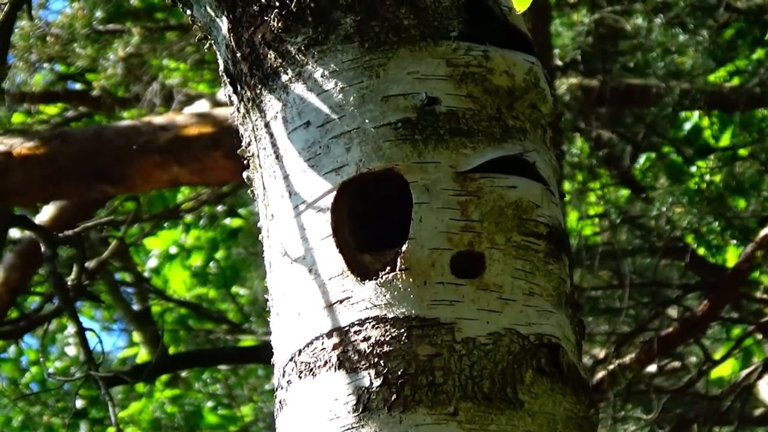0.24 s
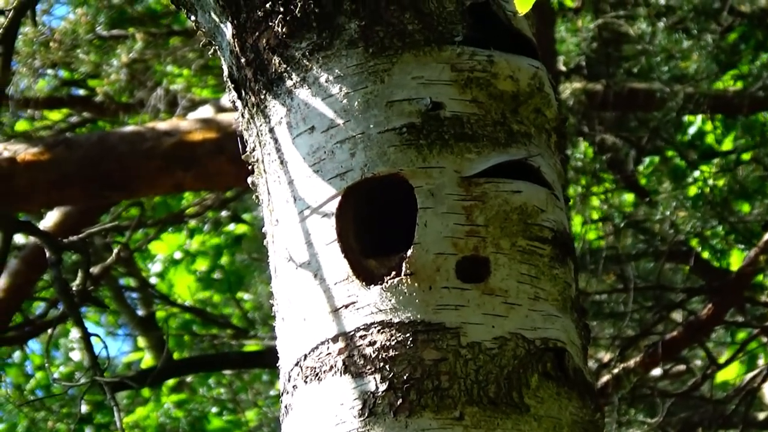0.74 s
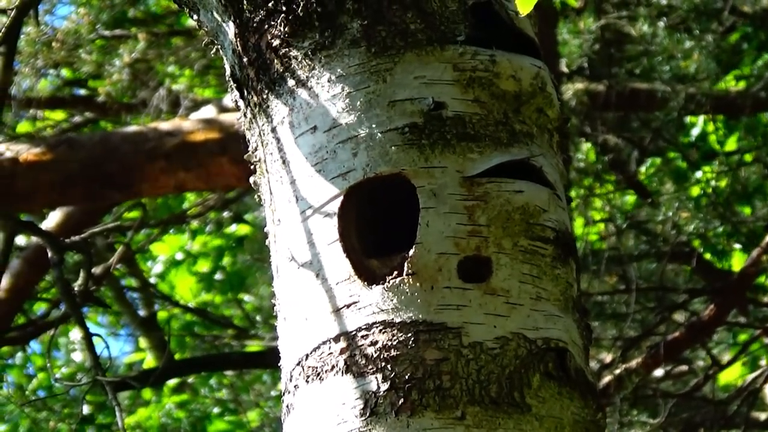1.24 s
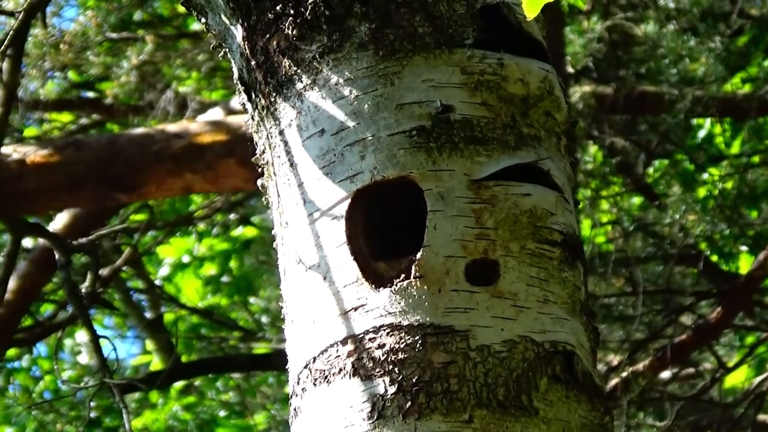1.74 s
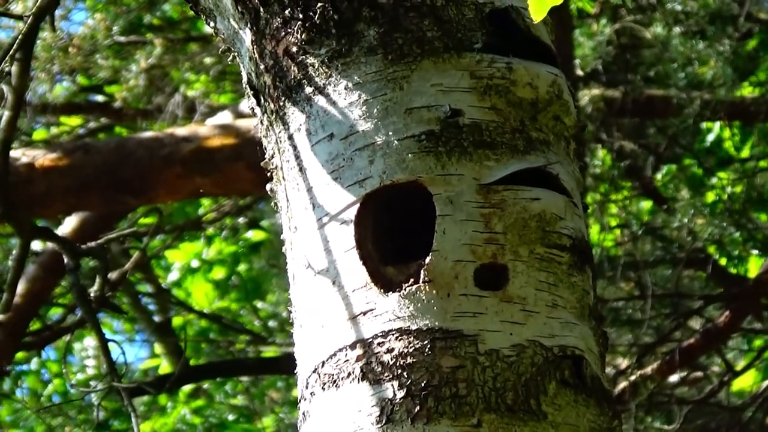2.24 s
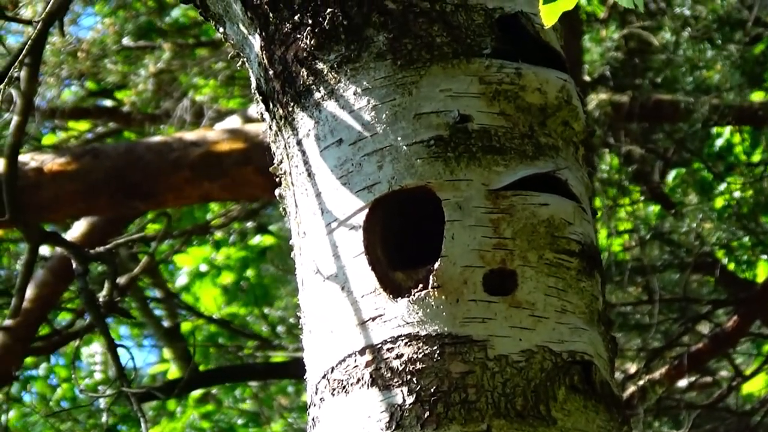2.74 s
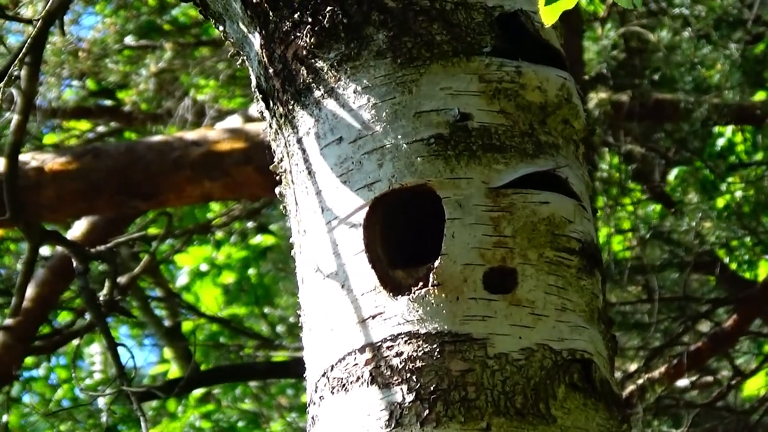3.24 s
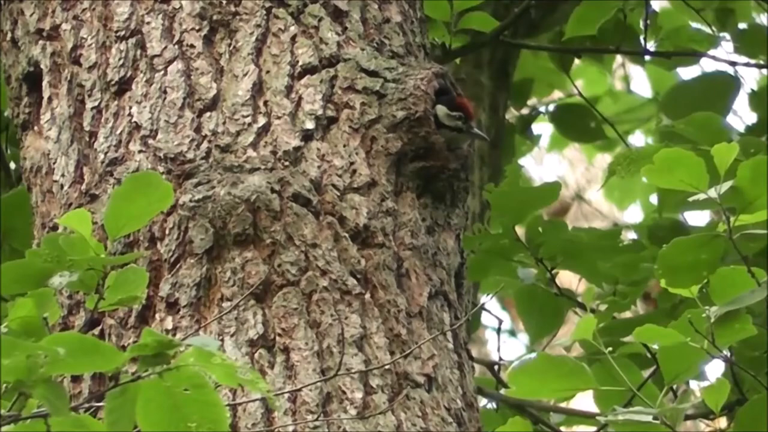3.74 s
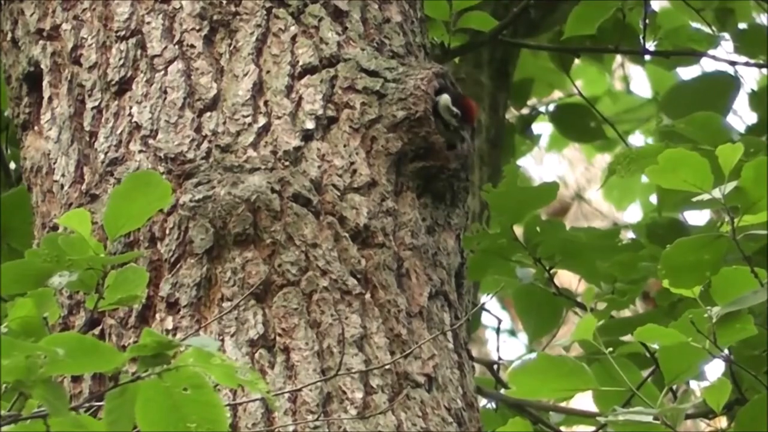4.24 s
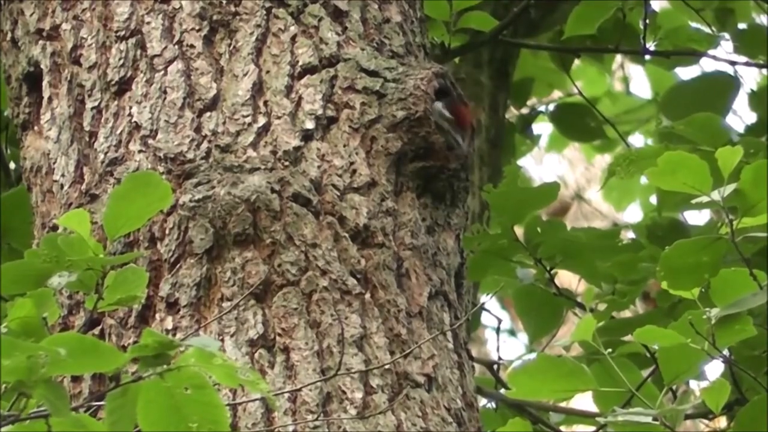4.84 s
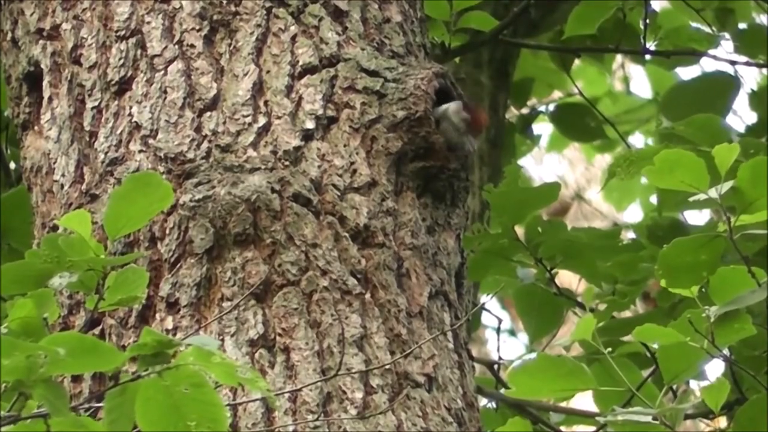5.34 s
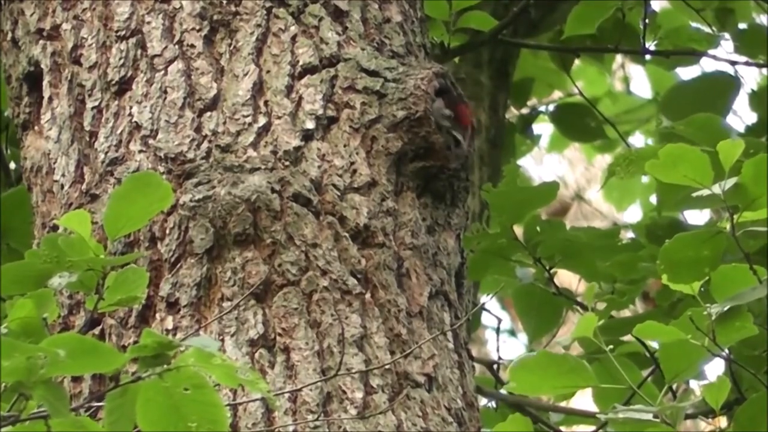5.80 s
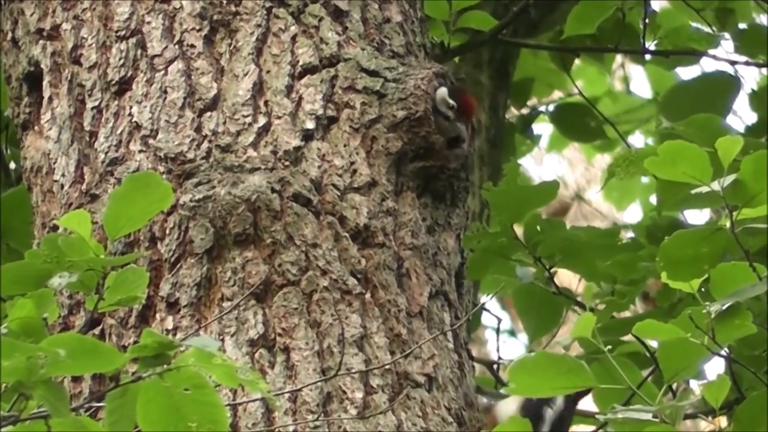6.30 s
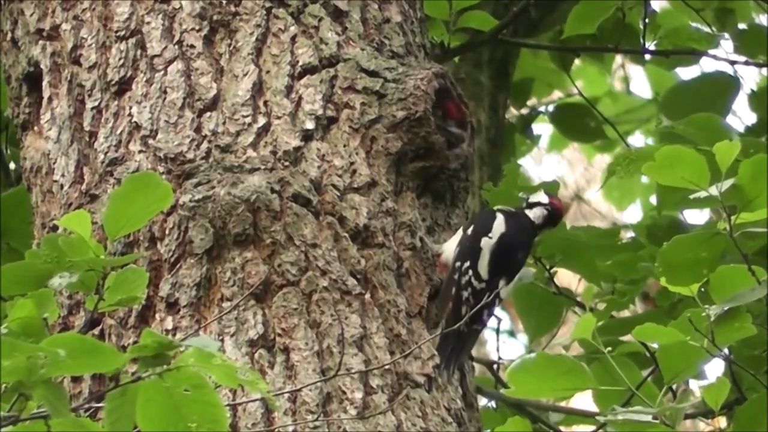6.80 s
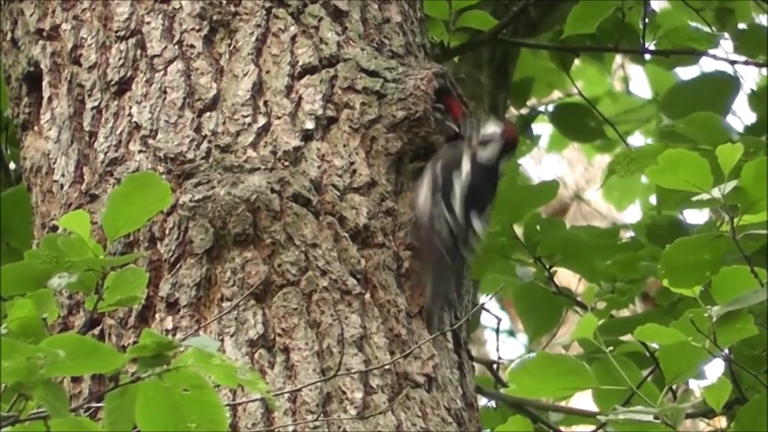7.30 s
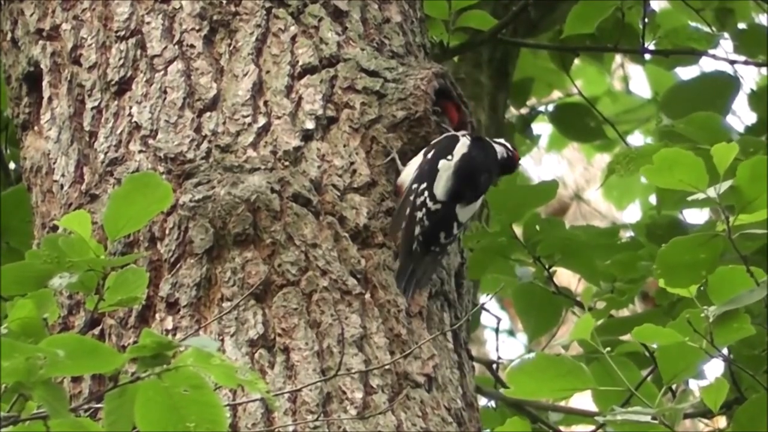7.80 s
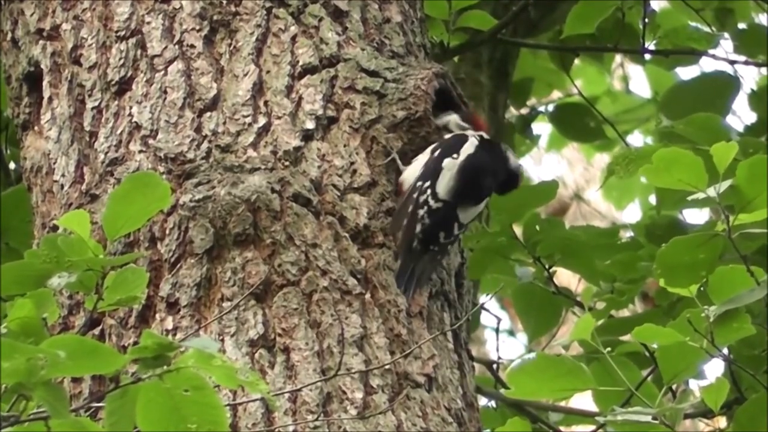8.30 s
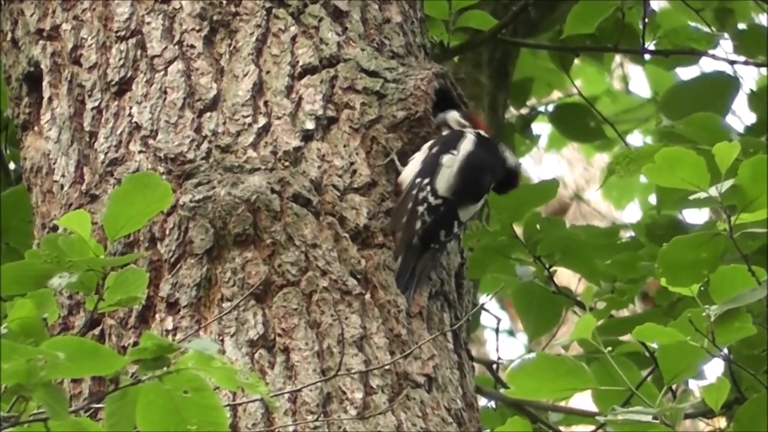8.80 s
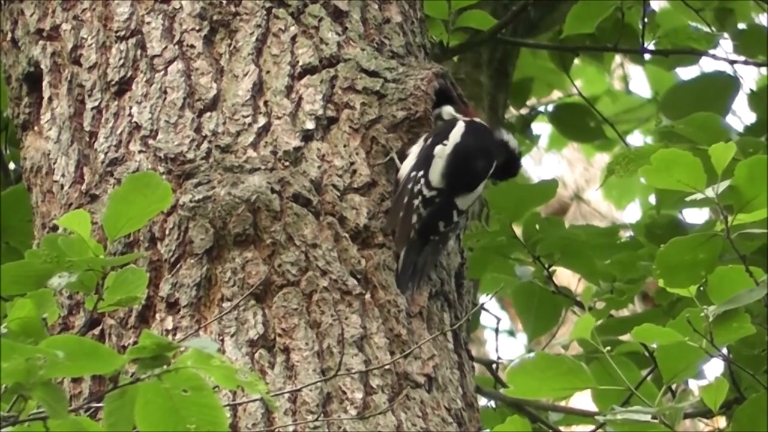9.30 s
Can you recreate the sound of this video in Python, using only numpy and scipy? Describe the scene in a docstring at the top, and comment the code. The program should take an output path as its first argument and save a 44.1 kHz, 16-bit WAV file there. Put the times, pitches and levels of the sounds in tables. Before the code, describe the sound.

Insistent begging squeaks from a close woodpecker nest cut to farther, echoing single chirps in a still forest, with a songbird whistling far off.

```python
"""A wood with two woodpecker nest holes, heard one after the other. Notes are gliding harmonic stacks plus hiss.
First, close by: a chick squeaks in quick pairs over a breeze of filtered noise and a faint sliding moan.
Second, further off, in quiet air and far traffic: a chick repeats one arched note that rings among the trees
(dense noise echoes), and falters as a parent feeds it, with a short rustle on the bark.
A distant songbird whistles in both: slurred sines with a long echo."""
import sys
import numpy as np
from scipy import signal
from scipy.fft import rfft, irfft, next_fast_len
from scipy.io import wavfile

SR = 44100
rng = np.random.default_rng(int(sys.argv[2]) if len(sys.argv) > 2 else 0)


def master_out(mix):
    """Clip the mix to full scale and print it as 16-bit PCM to the path in sys.argv[1]."""
    frames = np.transpose(np.atleast_2d(mix))
    ceiling = np.clip(frames, -1, 1)
    pcm = np.round(ceiling * 32767).astype(np.int16)
    wavfile.write(sys.argv[1], SR, pcm)


N = 421155
TIME = np.arange(N) / SR   # s


def from_db(db):
    """Decibels to amplitude gain."""
    return 10 ** (np.asarray(db) / 20)


def rms_one(x):
    """Scale to unit power."""
    return x / np.sqrt(np.mean(x ** 2) + 1e-20)


def in_time(rows):
    """Control curve at every sample, linear between (t/s, value) rows."""
    return np.interp(TIME, *np.transpose(rows))


def at_hz(points, hz):
    """Read (f/Hz, value) points on a log-frequency axis."""
    f_hz, value = np.transpose(points)
    return np.interp(np.log(np.maximum(hz, 1)), np.log(f_hz), value)


def wander(size, rate_hz, count=512):
    """Random motion about 0: straight lines between unit-normal points."""
    return np.interp(np.arange(size) * rate_hz / SR, np.arange(count), rng.standard_normal(count))


def noise(spectrum, channels=2):
    """Unrelated noises with one spectrum, rms 1."""
    size = next_fast_len(N)
    hz = np.fft.rfftfreq(size, 1 / SR)
    bins = rfft(rng.standard_normal((channels, size))) * from_db(at_hz(spectrum, hz))
    return rms_one(irfft(bins, size)[:, :N])


def stereo(pair, likeness):
    """Mix two unrelated noises into left and right of the given correlation."""
    c = np.clip(likeness, 0, 1)
    middle = np.sqrt(1 + c) * pair[0]
    side = np.sqrt(1 - c) * pair[1]
    return (middle + side * [[1], [-1]]) / np.sqrt(2)


def lean(x, left_db):
    """Set left against right by left_db; the two gains sum to 2."""
    left = from_db(left_db)
    return x * 2 * np.array([[left], [1]]) / (1 + left)


def add(track, start_s, sound):
    """Lay a sound into a track at a time."""
    i = max(round(start_s * SR), 0)
    track[i:i + len(sound)] += sound[:N - i]


# Colour of the wood's echo: f/Hz, level/dB
FOREST = [(1000, -4.5), (2400, 4), (4700, 9), (7200, 2.5), (9000, -5), (14000, -1.5)]


def scatter(x, t60_s, build_s, likeness, spectrum=FOREST):
    """Dense echoes off bark and leaves: they build up, then die away."""
    t = TIME[:SR + SR // 2]
    envelope = from_db(-60 * t / t60_s) * (1 - np.exp(-t / build_s))
    tail = rng.standard_normal((2, len(t))) * envelope
    tail = stereo(tail / np.sqrt(np.sum(tail ** 2, axis=1, keepdims=True)), likeness)
    colour = from_db(at_hz(spectrum, np.fft.rfftfreq(len(t), 1 / SR)))
    tail = irfft(rfft(tail) * colour)[:, :SR + SR // 4]
    return signal.fftconvolve(x[None], tail, axes=1)[:, :N]


# Quiet air, relative density: f/Hz, level/dB per Hz
STILL_AIR = [(18, -49), (30, -12), (192, -11.5), (420, -13.5), (1330, -15), (2300, -7), (2620, -6.5),
             (4540, -5.5), (5170, -9), (6540, -8.5), (7260, -18), (11900, -28), (15500, -44)]
# Left-right difference of the quiet air: f/Hz, side-to-middle level/dB
AIR_WIDTH = [(60, -16), (200, -4), (380, 0), (700, -0.5), (1300, -2.5), (2400, -23.5), (8000, -72)]
# Far traffic, before drone_trim_db: t/s, level/dB
DRONE = [(3.62, -56), (6.03, -65.5), (7.7, -57), (9.5, -72)]


def calm_wood(air_db=-53, drone_trim_db=-2):
    """Quiet air, wide in the low middle and centred in the treble, and a low swell of far traffic."""
    middle, side = noise(STILL_AIR)
    size = next_fast_len(N)
    width = from_db(at_hz(AIR_WIDTH, np.fft.rfftfreq(size, 1 / SR)))
    side = irfft(rfft(side, size) * width, size)[:N]
    air = from_db(air_db) * (middle + side * [[1], [-1]])
    drone_spectrum = [(40, -40), (80, -10.5), (140, -13.5), (215, -4.0), (270, -8.5), (400, -19.0), (1200, -77)]
    drone = stereo(noise(drone_spectrum), likeness=1.0)
    return air + from_db(in_time(DRONE) + drone_trim_db) * drone


# Air moving in the crowns, relative density: f/Hz, level/dB per Hz
BREEZE = [(30, -11.5), (70, -5), (150, -1), (350, 0), (700, -1.5), (1000, -5.5), (1500, -10.5), (3000, -15),
          (7000, -21), (11000, -21.5), (15500, -26.5)]
# Its level, before air_trim_db: t/s, level/dB
BREEZE_LEVEL = [(0.0, -39.5), (0.67, -40), (0.8, -40), (3.5, -40.5)]
# Wind on the microphone: t/s, level/dB
GUSTS = [(0.0, -54.5), (0.29, -44), (0.41, -67), (2.01, -64.5), (2.27, -44.5), (3.32, -68), (3.5, -51)]


def breeze(air_trim_db=1.5, air_left_db=-11.5, gust_left_db=-15):
    """Moving air in the crowns and soft buffets on the microphone, mostly from the right."""
    air = from_db(in_time(BREEZE_LEVEL) + air_trim_db) * stereo(noise(BREEZE), likeness=0.51)
    buffet_spectrum = [(10, -8.5), (30, -9.5), (70, 1.0), (160, -22), (600, -86)]
    buffets = from_db(in_time(GUSTS)) * stereo(noise(buffet_spectrum), likeness=0.43)
    return lean(air, air_left_db) + lean(buffets, gust_left_db)


def moan(start_s=0.54, length_s=0.48, start_hz=520, end_hz=300, level_db=-45, wander_hz=70, left_db=-10):
    """A faint, hollow low tone slides down within the breeze: a carrier blurred by random modulation."""
    track, size = np.zeros(N), int(length_s * SR)
    phase = 2 * np.pi * np.cumsum(np.geomspace(start_hz, end_hz, size)) / SR
    tone = wander(size, wander_hz) * np.sin(phase) + wander(size, wander_hz) * np.cos(phase)
    add(track, start_s, signal.windows.tukey(size, .5) * tone)
    return lean(from_db(level_db) * track, left_db)


# Whistles: t/s, length/s, start f/Hz, end f/Hz, level/dB before the direct and forest gains
WHISTLES = [(0.081, 0.082, 2350, 1840, -37.5), (0.158, 0.084, 2200, 1840, -39.5),
            (1.21, 0.16, 3545, 3470, -49.5), (3.298, 0.098, 3900, 3720, -44.5),
            (6.261, 0.24, 2740, 3014, -51), (7.421, 0.049, 3410, 2520, -46), (7.477, 0.07, 2362, 2346, -42),
            (7.709, 0.06, 2574, 2875, -38.5), (8.021, 0.067, 4430, 3200, -42),
            (8.096, 0.073, 2780, 3295, -41), (8.263, 0.11, 4030, 3494, -38), (8.447, 0.13, 3574, 3420, -43),
            (8.598, 0.045, 4860, 3060, -46.5), (8.643, 0.066, 3244, 2570, -38.5),
            (8.843, 0.046, 2910, 2550, -42), (9.033, 0.088, 2928, 3114, -42),
            (9.119, 0.036, 2940, 2430, -42.5), (9.219, 0.074, 3403, 3520, -44)]


def songbird(direct_db=-4, forest_db=1.0, waver=0.019, waver_hz=500):
    """Slurred whistles, unsteady gliding sines, that leave a long echo."""
    song = np.zeros(N)
    for start_s, length_s, start_hz, end_hz, level_db in WHISTLES:
        size = int(length_s * SR)
        hz = np.geomspace(start_hz, end_hz, size) * (1 + waver * wander(size, waver_hz))
        whistle = signal.windows.tukey(size, .5) * np.sin(2 * np.pi * np.cumsum(hz) / SR)
        add(song, start_s, from_db(level_db) * whistle)
    echo = scatter(song, t60_s=1.0, build_s=0.0014, likeness=0.99)
    return from_db(direct_db) * song + from_db(forest_db) * echo


def scuffles(start_s=8.79, length_s=0.078, level_db=-43, grain_db=4, grain_hz=416):
    """A short scratchy rustle on the bark during feeding: noise under an uneven hump."""
    level, size = np.zeros(N), int(length_s * SR)
    grain = grain_db * np.tanh(wander(size, grain_hz))
    add(level, start_s, np.hanning(size) * from_db(level_db + grain))
    return level * noise([(800, -30), (2200, 7.0), (5500, -1.0), (9000, -11), (15000, -41)], channels=1)


ONSET_S, BREAK_S = 0.00554, 0.0037   # the voice settles; the voice breaks up
TRAIL_S = 0.0046   # every note trails on a little as the air runs out
CLEAR_ROUGHNESS = .1   # at the top of a note, 0-1


def note_course(length_s, top_at, crown, rise, fall, flip, attack_s, release_s, swell_db,
                break_at, break_db, rough_onset, rough_broken):
    """Pitch, gain, roughness: air pressure arches pitch and level; on the way down the voice breaks."""
    t = TIME[:int((length_s + TRAIL_S) * SR)]
    from_top = t / length_s - top_at
    slope = np.where(from_top < 0, rise, fall)
    sag = np.minimum(slope * (np.hypot(from_top, crown) - crown), .7)
    onset = np.exp(-(t / ONSET_S) ** 2)
    broken = .5 + .5 * np.tanh((t - break_at * length_s) / BREAK_S)
    attack = np.sin(np.pi / 2 * np.clip(t / attack_s, 0, 1)) ** 2
    release = np.clip((t[-1] - t) / release_s, 0, 1)
    pitch = 1 - sag + flip * onset
    gain = attack * release * from_db(-swell_db * sag - break_db * broken)
    rough = CLEAR_ROUGHNESS + rough_onset * onset + (rough_broken - CLEAR_ROUGHNESS) * broken
    return pitch, gain, np.clip(rough, 0, 1)


NOTE_SAMPLES = 8192   # room for the longest note
DULLING_DB = 25   # treble lost as the pitch strays from the top of the arch, per top pitch


def squeak(kind, throat, length_s, top_hz, level_db, bright_db, jitter, hiss_db,
           flutter=0.9, rough_hz=1600, tremble_db=2.5, tremble_hz=160):
    """One note: gliding harmonics through the throat, rough and hissy as the pressure drops."""
    pitch, gain, rough = note_course(length_s, **kind)
    size = len(pitch)
    hz = top_hz * pitch * (1 + jitter * rough * wander(size, rough_hz))
    k = np.arange(1, 11)[:, None]   # harmonic numbers
    treble_db = (bright_db - DULLING_DB * np.abs(1 - pitch)) * (k > 2)
    below_top = np.clip((17000 - k * hz) / 1000, 0, 1)   # fade harmonics out over 16-17 kHz
    weights = from_db(at_hz(throat, k * hz) + treble_db) * below_top
    weights /= np.sqrt(np.sum(weights ** 2, axis=0))
    # the beak trembles, so each harmonic swells and sinks on its own
    weights = weights * from_db(tremble_db * np.tanh([wander(size, tremble_hz) for _ in k]))
    phase = k * 2 * np.pi * np.cumsum(hz) / SR + rng.uniform(0, 2 * np.pi, k.shape)
    stack = np.sum(weights * np.sin(phase), axis=0)
    stack *= 1 + flutter * rough * np.tanh(wander(size, rough_hz))
    # turbulence arises nearer the beak, so the throat colours it half as strongly
    hiss_colour = from_db(at_hz(throat, np.fft.rfftfreq(NOTE_SAMPLES, 1 / SR)) / 2)
    hiss = rms_one(irfft(rfft(rng.standard_normal(NOTE_SAMPLES)) * hiss_colour))[:size]
    return (stack + from_db(hiss_db) * np.sqrt(rough) * hiss) * gain * from_db(level_db)


# Arched notes: t/s, length/s, top f/Hz
ARCH_NOTES = [(3.524, 0.057, 2403), (3.8655, 0.064, 2428), (4.13, 0.071, 2366), (4.3, 0.068, 2300),
              (4.4747, 0.063, 2270), (4.656, 0.082, 2522), (4.849, 0.071, 2385), (5.0468, 0.064, 2257),
              (5.23, 0.061, 2372), (5.431, 0.073, 2515), (5.647, .063, 2430), (5.8457, 0.059, 2445),
              (6.037, 0.064, 2380), (6.2353, .072, 2560), (6.45, 0.067, 2408), (6.6556, 0.064, 2617),
              (6.882, 0.082, 2620), (7.095, .075, 2440), (7.2968, .07, 2654), (7.547, 0.075, 2528),
              (7.759, 0.076, 2566), (7.976, 0.097, 2610), (8.184, 0.069, 2398), (8.417, 0.068, 2248),
              (8.638, 0.067, 2231), (8.9303, .04, 2110), (9.334, 0.085, 2392), (9.528, 0.074, 2470)]
# Note shapes, whole and cut short near the top of the arch. top_at, crown, break_at: share of length;
# rise, fall: top pitches per length; flip: share of top pitch at onset; attack_s, release_s [s];
# swell_db [dB per top pitch]; break_db: loss when the voice breaks [dB]; rough_onset, rough_broken [0-1]
ARCH = dict(top_at=.44, crown=.45, rise=1.35, fall=1.9, flip=-0.203, attack_s=0.0092, release_s=0.0041, swell_db=14.5, break_at=0.67, break_db=5, rough_onset=0.43, rough_broken=0.61)
CUT_SHORT = dict(top_at=.55, crown=0.64, rise=.75, fall=0.18, flip=-0.154, attack_s=0.0048, release_s=0.032, swell_db=22, break_at=0.59, break_db=-0.5, rough_onset=0.56, rough_broken=0.38)
# Throat, beak and nest hole: f/Hz, level/dB
FAR_THROAT = [(1000, -31), (1700, -16.5), (2400, -9.5), (3000, -6.5), (4600, -8), (5600, 0), (7300, 0),
              (8500, -3), (10200, -8.5), (11500, -15), (13000, -21.5), (15500, -35)]
# The parent's body in front of the hole: f/Hz, level/dB
SCREEN = [(2400, 2.5), (6600, -3), (9000, -6.5), (14000, -8)]
# Chick comes to the hole, begs, is screened; before push and gain: t/s, level/dB, treble level/dB
BEGGING = [(3.55, -28.5, -9), (3.871, -29, -8.5), (4.15, -26, -0.5), (4.7, -24, 4.5), (5.7, -24, 5),
           (7.3, -28, 3.5), (8.0, -29.5, 6), (8.18, -29.5, 1.5), (8.7, -27, 7.5), (9.35, -32, -7)]
# Feeding: start t/s, end t/s
FEEDING_S = (8.1, 9.2)


def far_chick(gain_db=0.5, trunks_db=-9, forest_db=-8, ref_hz=2570, push_db_per_octave=13.5,
              treble_db_per_octave=19, catch_db=-20, catch_hz=1250, catch_lead_s=.019, catch_length_s=0.0184):
    """Arched notes, louder and brighter when higher, each led in by a tiny, ever-varying low catch."""
    voice = np.zeros(N)
    chance = rng.uniform(-1.11, 1, (len(ARCH_NOTES), 2))
    times_s, levels_db, trebles_db = np.transpose(BEGGING)
    screened = [(hz, db + at_hz(SCREEN, hz)) for hz, db in FAR_THROAT]
    catch_throat = [(1200, -4.5), (3300, 1.5), (9000, -32)]
    for (start_s, length_s, top_hz), (higher, louder) in zip(ARCH_NOTES, chance):
        push = np.log2(top_hz / ref_hz)   # octaves
        level_db = np.interp(start_s, times_s, levels_db) + push_db_per_octave * push
        bright_db = np.interp(start_s, times_s, trebles_db) + treble_db_per_octave * push
        fed = FEEDING_S[0] < start_s < FEEDING_S[1]
        kind, throat = (CUT_SHORT, screened) if fed else (ARCH, FAR_THROAT)
        note = squeak(kind, throat, length_s, top_hz, level_db + gain_db, bright_db, jitter=0.031, hiss_db=-13)
        add(voice, start_s, note)
        catch = squeak(ARCH, catch_throat, catch_length_s, catch_hz * (1 + 0.153 * higher),
                       level_db + catch_db + 3 * louder, 0, jitter=0.3, hiss_db=-3.5)
        add(voice, start_s - catch_lead_s, catch)
    trunk_spectrum = [(1500, 1.0), (5000, 1), (12000, -0.97)]
    trunks = scatter(voice, t60_s=0.037, build_s=0.0081, likeness=1, spectrum=trunk_spectrum)
    forest = scatter(voice, t60_s=0.72, build_s=0.0023, likeness=1.0)
    return voice + from_db(trunks_db) * trunks + from_db(forest_db) * forest


# Squeaks: t/s, length/s, top f/Hz
SQUEAKS = [(0.0184, 0.064, 2577), (0.1717, 0.065, 2565), (0.262, 0.061, 2575), (0.4153, 0.071, 2545),
           (0.5158, 0.059, 2587), (0.6674, 0.077, 2570), (0.7664, 0.06, 2583), (0.9155, 0.077, 2595),
           (1.0952, 0.074, 2614), (1.1953, 0.065, 2586), (1.3501, 0.063, 2542), (1.4327, .061, 2595),
           (1.5844, 0.072, 2602), (1.6776, .061, 2578), (1.8314, .066, 2545), (1.916, 0.061, 2564),
           (2.068, 0.062, 2606), (2.156, 0.056, 2532), (2.3076, 0.064, 2558), (2.399, 0.056, 2582),
           (2.5475, 0.074, 2592), (2.6562, 0.061, 2544), (2.811, 0.062, 2552), (2.894, 0.058, 2557),
           (3.0412, 0.062, 2525), (3.1234, 0.058, 2572), (3.2724, 0.066, 2528), (3.3648, .06, 2566),
           (3.5145, 0.043, 2577)]
# Note shapes, first and second of a pair; fields and units as for ARCH
LEAD = dict(top_at=.3, crown=.23, rise=0.761, fall=.55, flip=.05, attack_s=0.011, release_s=0.031, swell_db=36.5, break_at=0.547, break_db=3, rough_onset=.4, rough_broken=0.67)
ANSWER = dict(top_at=.23, crown=.25, rise=0.32, fall=0.37, flip=0.1107, attack_s=0.0082, release_s=0.035, swell_db=32.5, break_at=0.39, break_db=1, rough_onset=0.44, rough_broken=0.49)
# Throat, beak and nest hole: f/Hz, level/dB
NEAR_THROAT = [(1300, -54), (1900, -20.5), (2550, -6.5), (3500, -19.5), (4500, -11), (5200, -14),
               (5800, -21), (6800, -1), (7600, 0.5), (8800, -14), (10300, -9), (11200, -18.5), (13000, -23),
               (15500, -28.5)]
# Left against right: f/Hz, level difference/dB
NEAR_BALANCE = [(2500, -4), (5000, -4.5), (7600, -1), (9000, -0.5), (10500, -3.5), (15000, -22)]
PAIR_GAP_S = .13   # a squeak this soon after another is the answer of a pair


def near_chick(lead_db=-10.5, answer_db=-12.5, lead_treble_db=2.3, answer_treble_db=1.0, ref_hz=2640,
               push_db_per_octave=7.5, treble_db_per_octave=44.5, tiring_db_per_s=0.38,
               catch_db=-18, catch_hz=2450, catch_lead_s=.014, catch_length_s=0.021,
               hole_db=-14, forest_db=-23, left_lag_s=.000011):
    """Paired squeaks from the hollow trunk, a little to the right, slowly tiring; a hoarse catch leads each."""
    voice, previous_s = np.zeros(N), 0
    for start_s, length_s, top_hz in SQUEAKS:
        if start_s - previous_s < PAIR_GAP_S:
            kind, level_db, treble_db = ANSWER, answer_db, answer_treble_db
        else:
            kind, level_db, treble_db = LEAD, lead_db, lead_treble_db
        previous_s = start_s
        push = np.log2(top_hz / ref_hz)   # octaves; pushing harder is higher, louder, brighter
        level_db = level_db + push_db_per_octave * push - tiring_db_per_s * start_s
        bright_db = treble_db + treble_db_per_octave * push
        note = squeak(kind, NEAR_THROAT, length_s, top_hz, level_db, bright_db, jitter=0.073, hiss_db=-14.0)
        add(voice, start_s, note)
        catch = squeak(LEAD, NEAR_THROAT, catch_length_s, catch_hz, level_db + catch_db, 0, jitter=0.223, hiss_db=1)
        add(voice, start_s - catch_lead_s, catch)
    hole_spectrum = [(2500, 2.5), (7500, 10.3), (14000, 12.0)]
    hole = scatter(voice, t60_s=0.11, build_s=0.00032, likeness=.1, spectrum=hole_spectrum)
    forest = scatter(voice, t60_s=0.38, build_s=0.0076, likeness=0.93)
    sound = voice + from_db(hole_db) * hole + from_db(forest_db) * forest
    # the left side hears it a little later and duller
    size = next_fast_len(N)
    hz = np.fft.rfftfreq(size, 1 / SR)
    left = from_db(at_hz(NEAR_BALANCE, hz)) * np.exp(-2j * np.pi * hz * left_lag_s)
    sides = 2 * np.array([left, np.ones_like(left)]) / (1 + np.abs(left))
    return irfft(rfft(sound, size) * sides, size)[:, :N]


def scene(change_s=3.556, fade_out_s=.008, fade_in_s=.035):
    """The first nest gives way abruptly to the second."""
    first = np.clip((change_s - TIME) / fade_out_s, 0, 1)
    second = np.clip((TIME - change_s) / fade_in_s, 0, 1) ** 2
    song = songbird()
    first_nest = breeze() + moan() + song + near_chick()
    second_nest = calm_wood() + song + scuffles() + far_chick()
    return first * first_nest + second * second_nest


def record(dry, cutoff_hz=16000):
    """The top is cut steeply by an elliptic low-pass."""
    return signal.sosfilt(signal.ellip(12, .1, 90, cutoff_hz, fs=SR, output="sos"), dry)


dry = scene()
out = record(dry)
master_out(out)
```